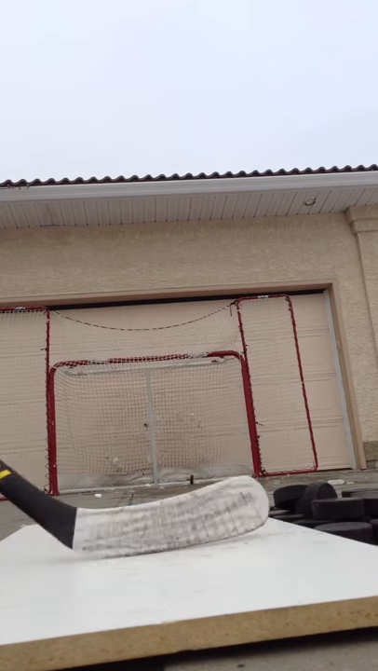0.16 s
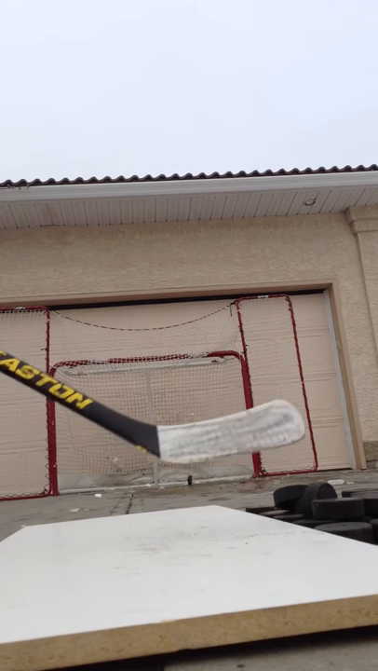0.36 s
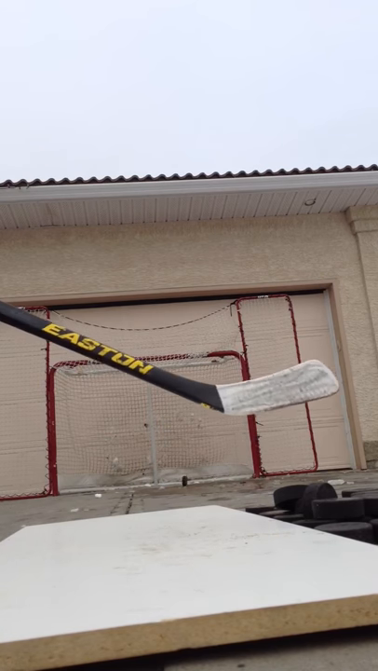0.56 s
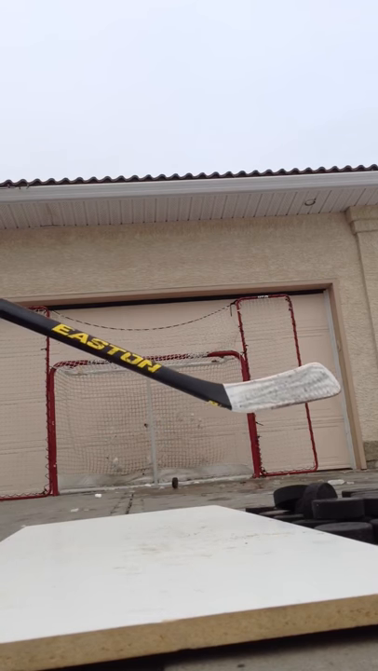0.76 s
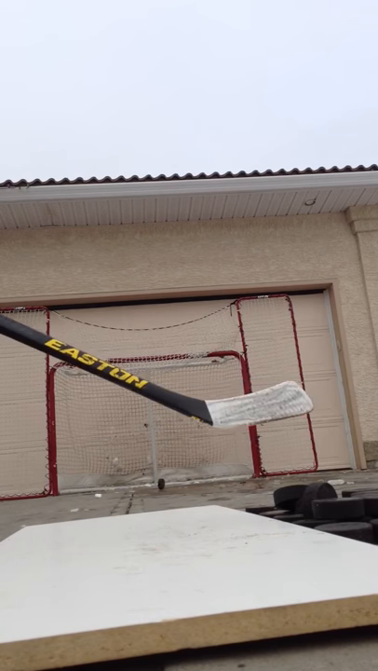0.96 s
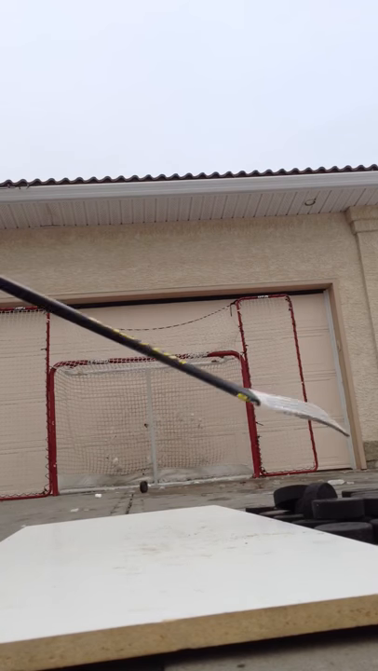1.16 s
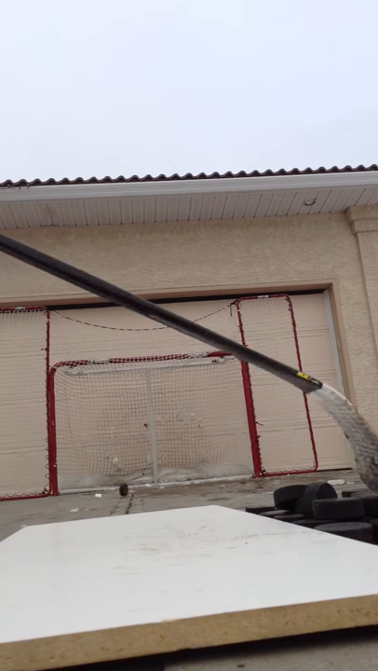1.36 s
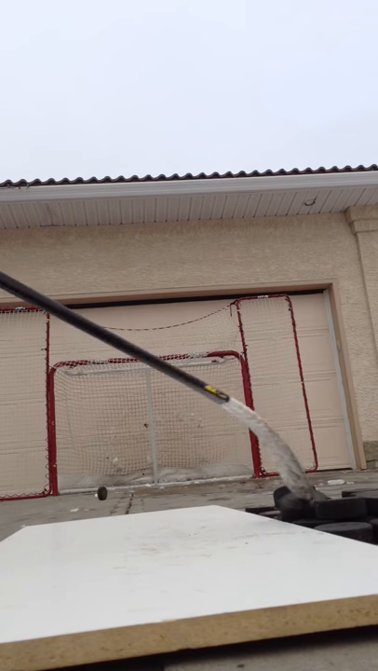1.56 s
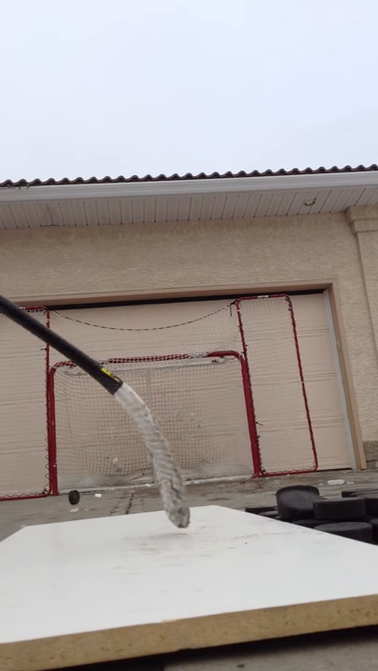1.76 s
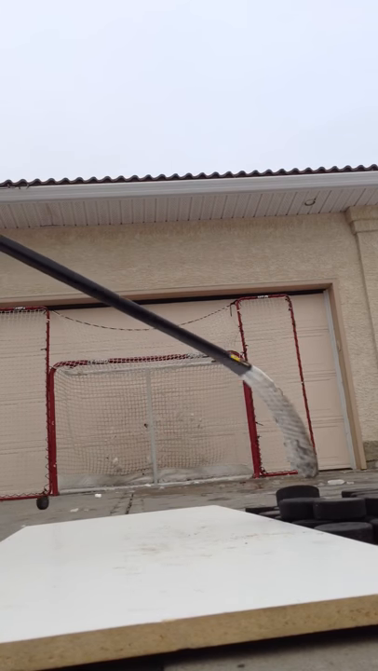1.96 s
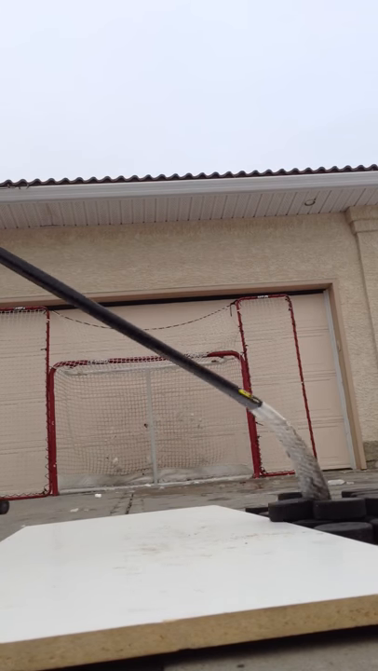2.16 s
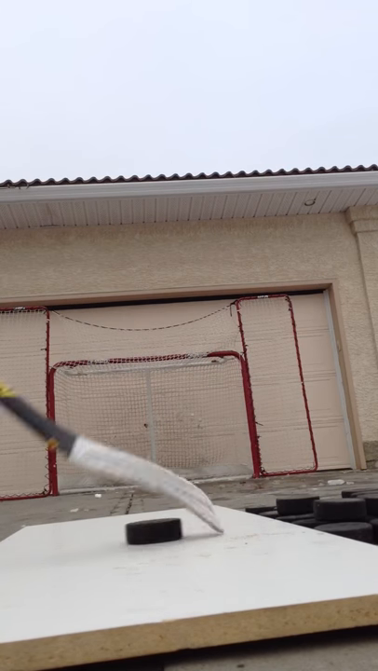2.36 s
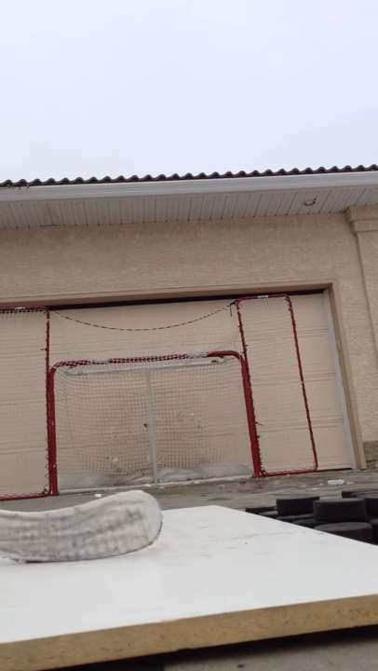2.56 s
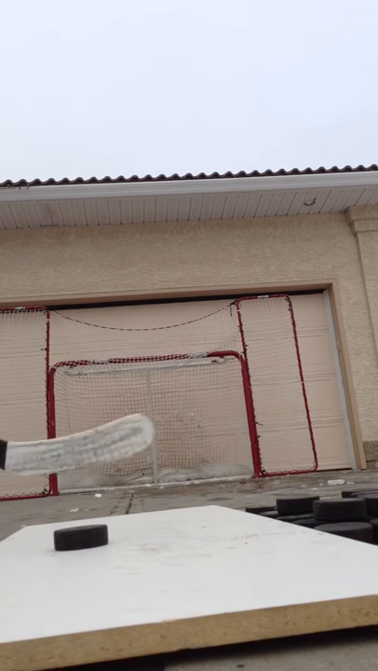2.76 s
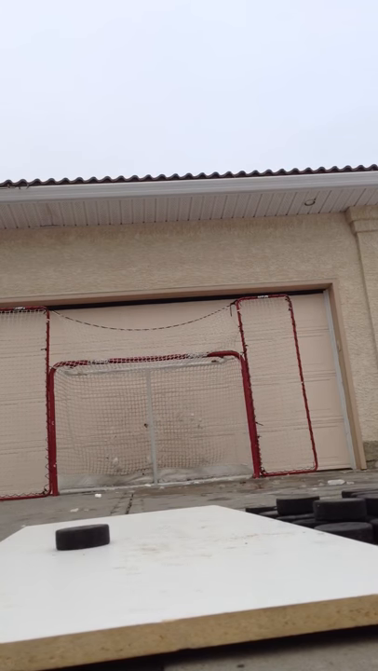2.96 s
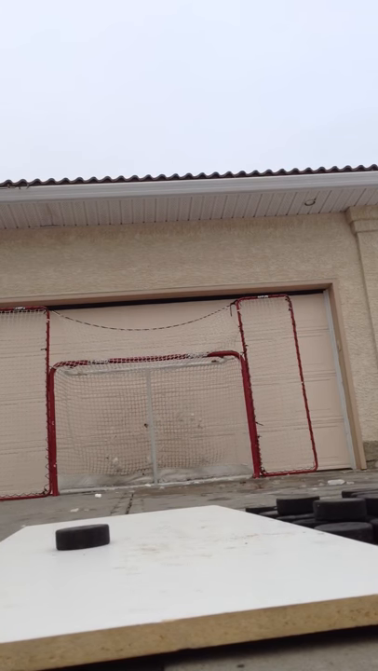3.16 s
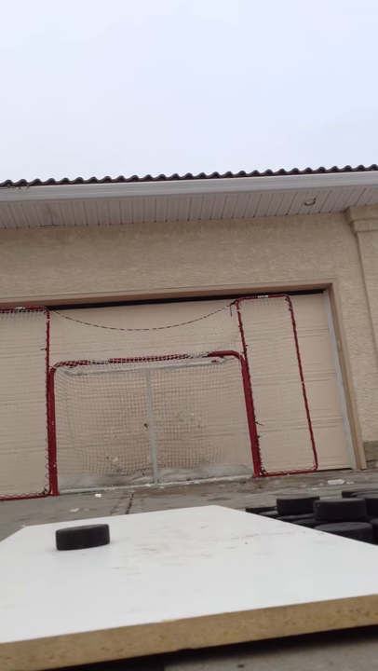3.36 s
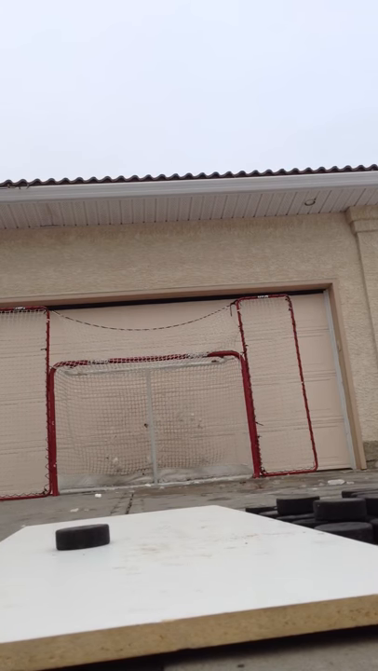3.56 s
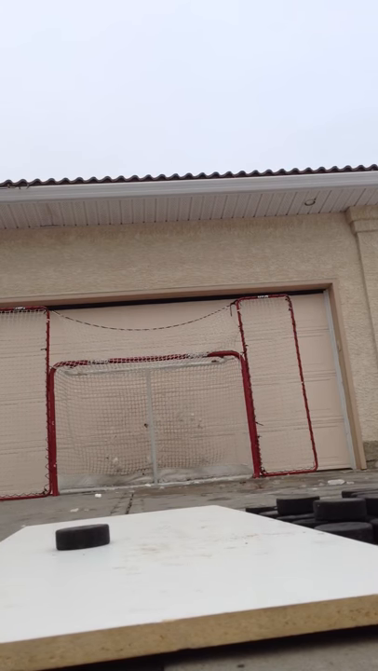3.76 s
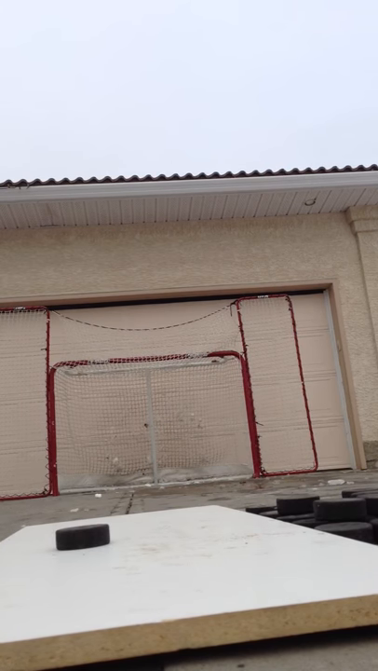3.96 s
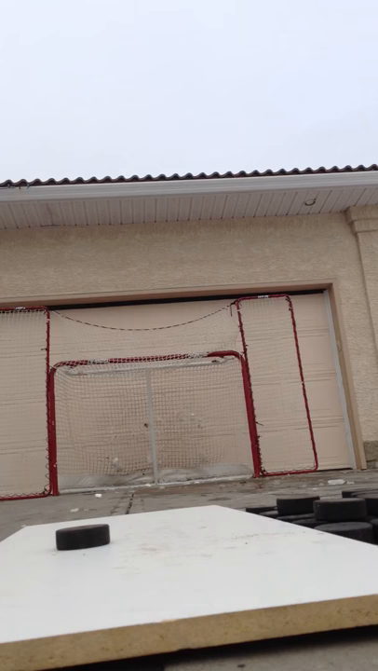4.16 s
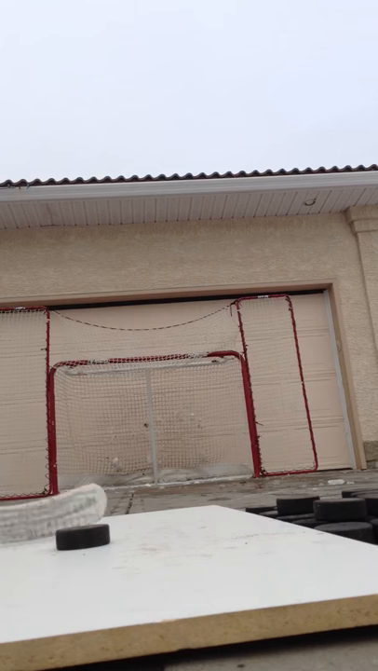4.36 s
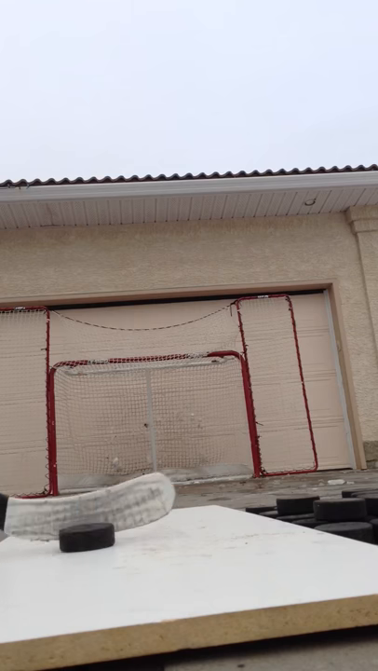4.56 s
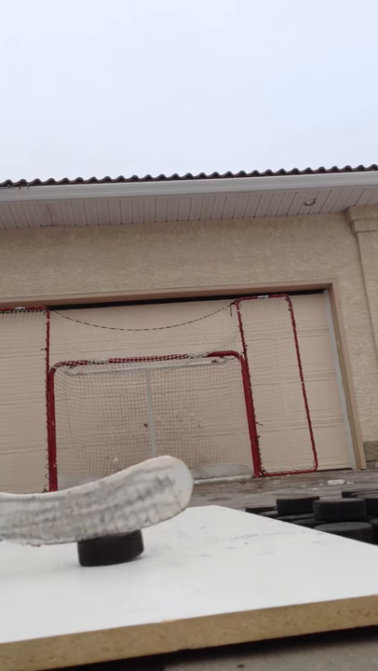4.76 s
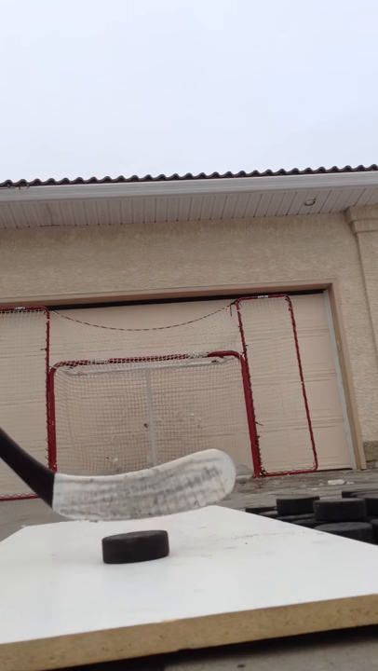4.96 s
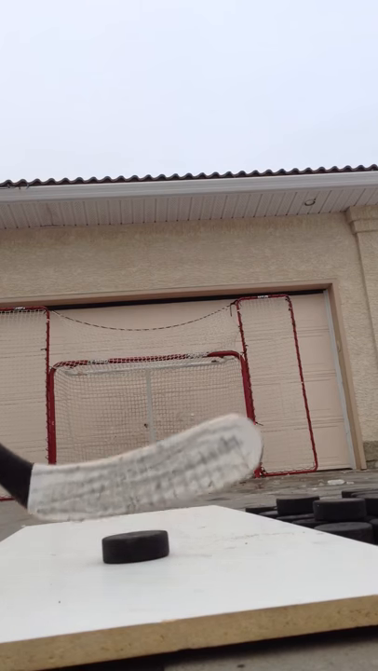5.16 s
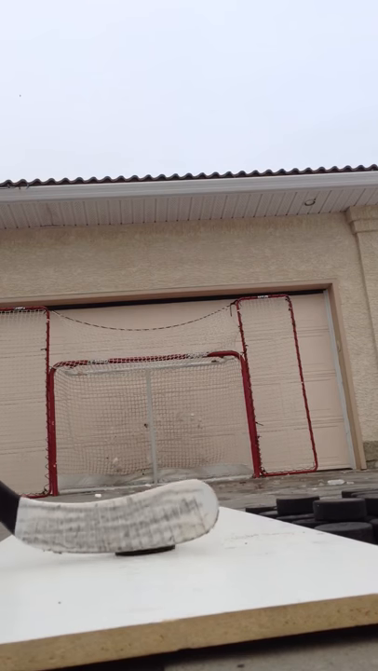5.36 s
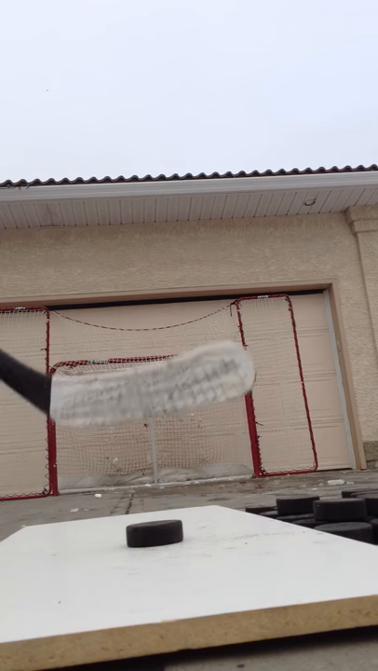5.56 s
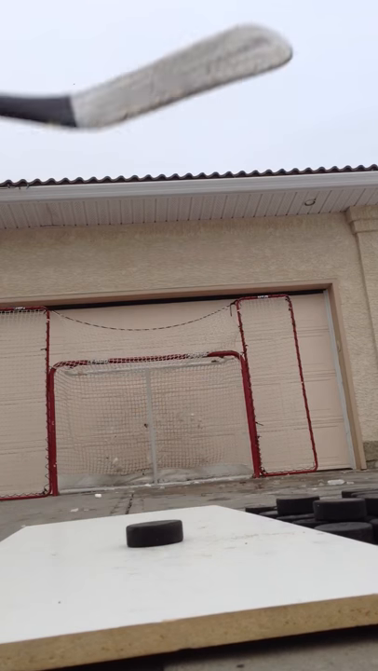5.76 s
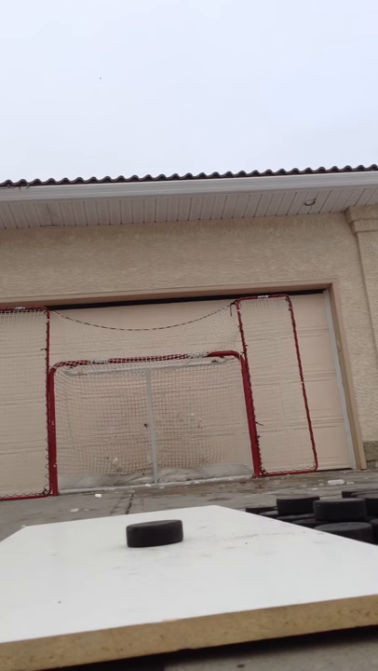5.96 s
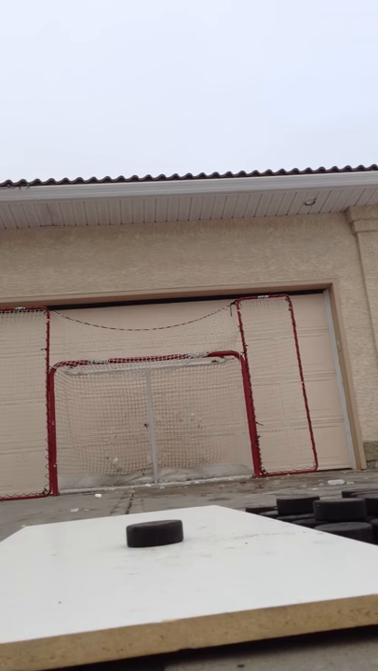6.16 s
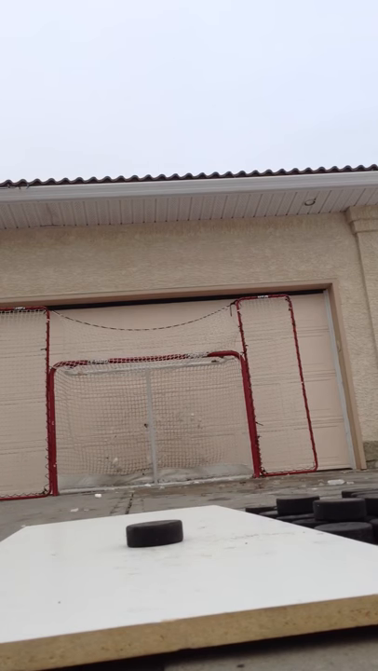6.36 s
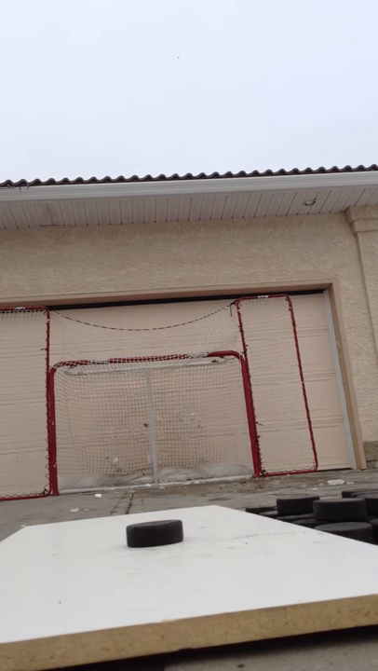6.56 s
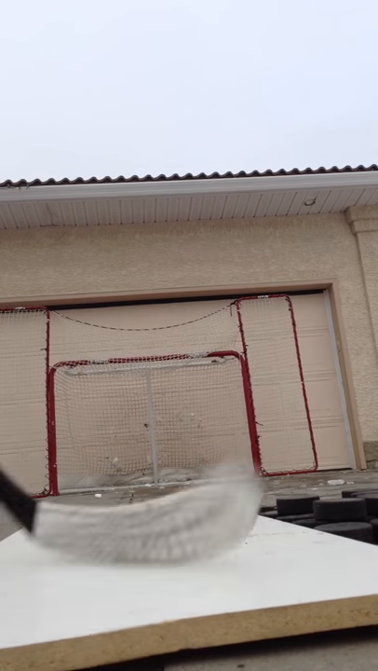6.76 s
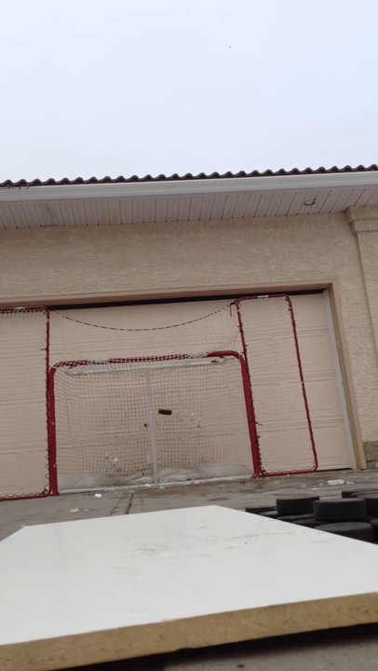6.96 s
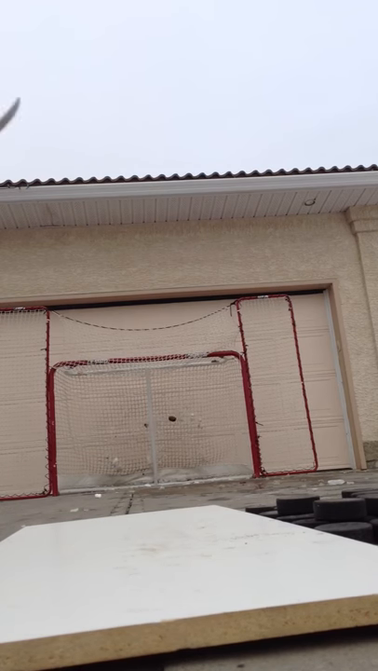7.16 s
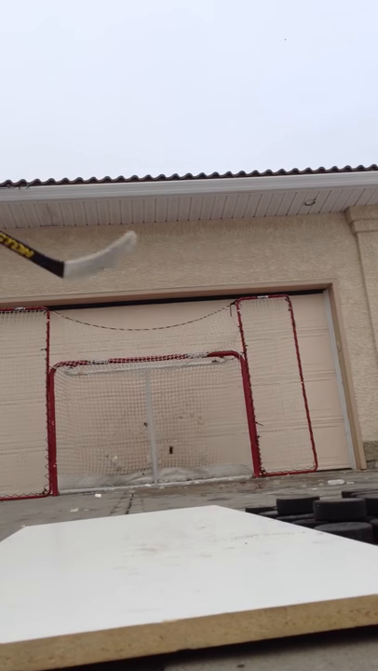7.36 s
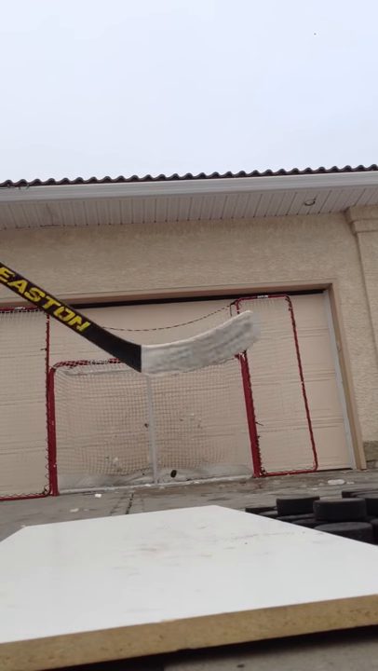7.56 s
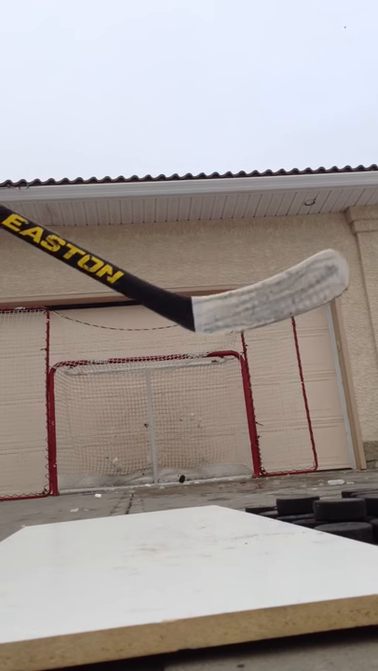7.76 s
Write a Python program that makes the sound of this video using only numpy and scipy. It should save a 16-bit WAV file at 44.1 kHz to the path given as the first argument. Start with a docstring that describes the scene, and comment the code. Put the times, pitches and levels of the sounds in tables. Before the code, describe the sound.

In a driveway, a hockey blade hits a board with a bright, hollow smack and short rattling bounces. Light clacks, a knock and a scraping pull bring a puck onto it. Feet shift on gritty concrete, then firm taps ring the board in two small groups. After a pause, a harsh burst of near-merged cracks fires the puck; the board clatters and shoes crunch. Faint echo from a garage front, dry and close.

```python
"""A hockey stick taps a shooting board in a driveway, rakes a puck from the pile, dribbles it and shoots.
Low rumble and hiss run throughout; shoes scuff and grit cracks as random slips and short noise bursts.
Each blow sends bending waves through the board, which rings in its modes and drops back on the concrete.
Blade and puck slide between blows; late on, the blade drives along the board in the shot.
The garage front echoes the impacts, and the microphone overloads on the loudest of them."""
import sys
import numpy as np
from scipy import signal
from scipy.fft import rfft, irfft, next_fast_len
from scipy.io import wavfile
from scipy.ndimage import uniform_filter1d

SR = 44100
rng = np.random.default_rng(int(sys.argv[2]) if len(sys.argv) > 2 else 0)


def transcribe(u):
    """Save the signal u as a 16-bit wav file named by the first command-line argument.

    u: samples, shape (n,) or (channels, n), limited to [-1, 1]; the rate is SR.
    q: integer samples, one column per channel.
    """
    v = np.clip(np.atleast_2d(u).T, -1, 1)
    q = np.round(v * 32767).astype(np.int16)
    wavfile.write(sys.argv[1], SR, q)


N = 344596

# steady distant rumble and hiss: (frequency [Hz], gain [dB])
AIR_COLOUR = [(25, -37.5), (55, -24), (90, -11), (150, 0), (260, 1.5), (420, -10.5), (800, -16),
              (1700, -23), (3500, -31), (8000, -31.5), (15000, -41)]
# gusts on the microphone: (start [s], length [s], level [dB])
GUSTS = [(6.16, 0.04, -43), (6.45, 0.3, -45), (6.76, 0.029, -36), (6.89, 0.1, -34)]
# gust spectrum: (frequency [Hz], gain [dB])
GUST_COLOUR = [(25, -23), (55, -13), (100, -0.5), (160, 2.5), (250, 1), (400, -25), (2000, -28)]
# the player's shoes and clothes shift: (start [s], length [s], rasp before trim [dB], hiss before trim [dB])
SHUFFLES = [(0, .16, -49.5, -46), (.19, .05, -61, -40.5), (1.05, 0.075, -61, -65), (1.24, 0.062, -64, -47),
            (1.34, 0.066, -54, -58), (1.53, 0.053, -60, -49), (1.96, 0.28, -56, -61),
            (2.95, 0.092, -51.5, -49), (3.07, 0.085, -48.5, -39), (3.22, 0.17, -59, -43),
            (3.32, 0.18, -52, -50), (3.66, 0.077, -58, -57), (3.75, .13, -52, -42.5),
            (3.9, 0.23, -55.5, -55), (4.32, .08, -65, -68.5), (4.41, .13, -63.5, -53.5),
            (6.25, 0.2, -49.5, -44), (6.48, 0.2, -48, -51.5), (6.63, 0.086, -52, -45.5),
            (6.79, 0.11, -42.5, -39), (7.17, 0.07, -41, -51), (7.39, 0.38, -41, -41.5),
            (7.69, 0.078, -44.5, -41.5)]
# blade and puck slide on the board: (start [s], length [s], rasp before trim [dB], hiss before trim [dB])
SLIDES = [(.27, 0.11, -34, -49), (.43, 0.15, -45.5, -59.5), (1.63, .1, -45, -43), (1.73, 0.056, -41, -42),
          (2.24, 0.55, -32.5, -42.5), (2.49, 0.17, -31.5, -44), (2.73, 0.15, -40.5, -58.5),
          (4.63, 0.18, -37.5, -45), (4.87, 0.09, -38.5, -60), (5.44, .12, -36, -50.5),
          (5.58, 0.032, -39.5, -44), (5.86, 0.026, -52.5, -53.5), (6.98, 0.14, -29.5, -41)]
# spectrum of the rubbing rasp: (frequency [Hz], gain [dB])
RASP_COLOUR = [(30, -58.5), (120, -10), (300, 8.5), (500, 10), (1100, 4.5), (2400, 5.5), (4000, -1.5),
               (7000, -20.5), (15000, -22)]
# spectrum of the rubbing hiss: (frequency [Hz], gain [dB])
HISS_COLOUR = [(40, -48.5), (300, -22.5), (1500, -5), (3500, 1), (5500, 0), (8000, 2.5), (11000, -2),
               (15000, -10)]
# short scuffs on concrete, and near 7.35 s the puck hitting the net or door: (time [s], length [s], level [dB])
SCUFFS_AND_HITS = [(3.03, 0.13, -35.5), (3.181, 0.017, -38.5), (3.717, 0.1, -41.5), (4.028, 0.077, -33.5),
                   (6.096, 0.056, -41.5), (7.293, 0.071, -31), (7.346, 0.09, -25), (7.365, 0.027, -21.5)]
# scuff spectrum: (frequency [Hz], gain [dB])
SCUFF_COLOUR = [(40, -38.5), (200, 2.5), (500, 1), (1500, -1.5), (3500, 1), (7000, 0.5), (11000, 0.5),
                (15000, -4.5)]
# grains of grit crack: (time [s], level [dB], centre [Hz])
GRIT = [(.1093, -37, 3500), (.3884, -31.5, 4440), (.4929, -33, 7020), (.5567, -40.5, 6500),
        (2.2666, -29, 8000), (3.069, -27, 1680), (3.116, -30.5, 1770), (3.3364, -30.5, 2800),
        (3.357, -38, 4000), (3.367, -28, 2800), (3.3905, -31.5, 2530), (3.414, -35.5, 2500),
        (4.0288, -31, 3960), (4.0442, -28.5, 5860), (4.0593, -33.5, 7000), (4.081, -31, 5000),
        (4.6307, -34.5, 5000), (4.826, -34, 8000), (6.9691, -18, 6900), (6.9787, -23, 5000),
        (6.9967, -28.5, 7000), (7.383, -12, 5100)]
# dry clacks and thumps of stick and pucks: (time [s], level [dB], centre [Hz], t60 [s])
CLACKS = [(.24, -21.5, 260, 0.15), (0.28, -22, 3000, 0.063), (0.5947, -39, 3700, 0.065),
          (0.661, -46.5, 4000, 0.082), (1.066, -46, 3000, .03), (1.3633, -25, 1700, 0.037),
          (1.5877, -33, 3000, 0.024), (1.6592, -32.5, 1400, 0.022), (2.1302, -32.5, 1000, 0.045),
          (2.168, -20.5, 1050, 0.018), (2.2227, -31, 8000, 0.018), (3.32, -28.5, 2600, .035),
          (3.4452, -19, 1700, 0.034), (3.48, -33.5, 5000, 0.022), (3.7231, -30.5, 1100, 0.028),
          (4.4248, -38.5, 2500, 0.024), (5.77, -48, 2000, 0.084), (6.1546, -30, 2200, 0.04),
          (7.299, -25.5, 5000, 0.062), (7.5556, -36.5, 1500, .04), (7.735, -38.5, 900, 0.1),
          (7.763, -34.5, 800, 0.052)]
# the bent blade drives along the board in the shot: (start [s], length [s], level [dB])
DRIVES = [(6.838, .04, -26.5), (6.876, 0.025, -12.5), (6.927, 0.0054, -13.5), (6.955, 0.083, -30)]
# spectrum of the driving blade: (frequency [Hz], gain [dB])
DRIVE_COLOUR = [(40, -43), (300, 2), (900, -7), (1400, -5.5), (2400, 0), (4000, -4.5), (6500, -7.5),
                (10000, -13.5), (15000, -24)]
# the board drops back on the concrete after a blow: (time [s], level [dB])
BOUNCES = [(.3058, -20.5), (.3201, -21.5), (.3515, -20.5), (.37, -15), (.4005, -21.5), (.4306, -18.5),
           (.4834, -29.5), (.5328, -29), (1.628, -39.5), (1.728, -25), (1.752, -28.5), (1.775, -28.5),
           (4.6607, -29), (4.9331, -29), (4.988, -32), (5.033, -29.5), (5.0494, -41), (5.0863, -36),
           (5.4121, -30.5), (5.4617, -31), (5.4989, -31), (6.9591, -18.5), (7.0624, -13.5), (7.085, -15),
           (7.1259, -11.5), (7.1593, -19), (7.1994, -23), (7.2235, -19.5), (7.2468, -36), (7.271, -26),
           (7.2862, -27.5), (7.319, -27.5)]
# blade, puck or shoe strikes the board:
# (time [s], level [dB], hardness [Hz], bass shelf [dB], relative ring [dB], damping [1 = none extra])
BLOWS = [(0.2401, -3, 3230, -15.5, 2, 0.78), (1.3631, -29.5, 975, 3, 5, 1.7),
         (1.603, -34, 523, -27, 12, 2.2), (1.7104, -11.5, 2520, -10, -2, 0.82),
         (2.23, -23, 1110, 10, 15, 1.4), (2.2713, -15.5, 1460, -12, 2, 1.02),
         (2.3128, -13.5, 1970, -14, 0, 1.2), (2.3454, -20, 1300, -17, 21, 1.3),
         (2.51, -20.5, 1210, 3, 15, 1.4), (2.6351, -16.5, 1990, -3.5, -11, 1.02),
         (2.7715, -29, 1120, -20, 14.5, 0.84), (3.446, -25, 860, 11, -6.5, 2.4),
         (3.483, -41, 810, -7, 9.5, 1.5), (4.4898, -8, 1303, -11, 15.5, 1.01),
         (4.6285, -15, 1250, 0, -12.5, 2.2), (4.755, -13, 1230, -17, 5, 1), (4.8264, -7, 1210, -1, 2, 1.19),
         (4.8885, -11, 1990, -1.5, -6, 1.2), (5.3524, -13, 1320, -17.5, 6.5, 0.91),
         (5.3579, -11.5, 1450, -13.5, -.5, 0.91), (5.3918, -15.5, 1220, 5, -13, 1.9),
         (6.107, -34, 730, 17, 13.5, 4.1), (6.876, -0.5, 2070, -19, 7, .6), (6.887, -10, 1720, -16, 15, 1),
         (6.8965, -4, 1610, -19, -1, 0.82), (6.9078, -9.5, 1780, -12, 15, .6),
         (6.9315, -19, 3000, 21, 7, .65), (6.945, -10.5, 1200, 25, -18, .7),
         (6.992, -25, 1400, -25, 0, 1.3), (7.014, -20.5, 1500, 9, 12, .65)]
# the board's modes, before each blow detunes and damps them: (frequency [Hz], level [dB], t60 [s])
BOARD_MODES = [(279.5, -6, 0.34), (419.6, -7, 0.27), (473.8, -3, .19), (557.5, -9.5, 0.24),
               (604.4, -8, 0.16), (684, -4, 0.16), (725, -5.5, 0.16), (828, -4.5, 0.19), (904, -21.5, 0.19),
               (981, -4.5, 0.14), (1026, -9, 0.078), (1113, 2, 0.056), (1154, -8.5, 0.14),
               (1272.5, -0.5, 0.094), (1370, -6, 0.033), (1398, -10, 0.068), (1568, -5, .055),
               (1930, 1, 0.029), (2150, 0, 0.033), (2370, -2.5, 0.041), (2763, -9.5, .04),
               (3260, -13, .035), (3700, -15.5, .02), (4930, -16, .022)]
# decay of bending waves in the board: (frequency [Hz], t60 [s])
WAVE_T60 = [(150, 0.3), (500, 0.39), (1200, 0.31), (2500, 0.054), (5000, .03), (14000, 0.006)]
# how well the board radiates: (frequency [Hz], gain [dB])
RADIATION = [(30, -36.5), (100, -38.5), (200, -9.5), (300, -2), (450, 3), (1200, -1.5), (3000, 5.5),
             (6000, 2), (10000, 6.5), (15000, -18.5)]
# decay of the outdoor tail: (frequency [Hz], t60 [s])
YARD_T60 = [(150, 0.33), (600, 0.91), (2000, 0.9), (4000, .5), (12000, .2)]

AIR_DB = -56
WHISTLE_START_S, WHISTLE_LENGTH_S, WHISTLE_HZ, WHISTLE_DB = 4.135, .24, 5770, -64
GRIT_T60_S = .011
# bounces are soft and bassy; a stronger one is a little harder
BOUNCE_HARD_HZ, BOUNCE_HARD_HZ_PER_DB = 1520, 16  # at 0 dB, and the slope
BOUNCE_BASS_DB, BOUNCE_RING_DB, BOUNCE_DAMPING = 16, -2, 1.22
BAND_LIMIT_HZ = 15600
SIZE = 16384  # samples in one impact
HZ = np.fft.rfftfreq(SIZE, 1 / SR) + 1  # offset keeps 0 Hz out of the divisions
AGE_S = np.arange(SIZE) / SR


def amp(db):
    """Decibels to gain."""
    return 10 ** (np.asarray(db) / 20)


def unit(x):
    """Scales to an rms of one."""
    return x / np.sqrt(np.mean(x ** 2) + 1e-20)


def fade(age_s, t60_s):
    """Exponential decay, 60 dB down after t60."""
    return np.exp(-np.log(1000) * age_s / t60_s)


def read(points, hz):
    """Interpolates a table on a log-frequency axis."""
    f, value = np.transpose(points)
    return np.interp(np.log(hz + 1), np.log(f), value)


def add(mix, start_s, sound):
    """Mixes a sound in at its start time."""
    part = mix[max(round(start_s * SR), 0):][:len(sound)]
    part += sound[:len(part)]


def causal(gain):
    """Minimum-phase response with this gain, by folding the cepstrum."""
    cepstrum = irfft(np.log(np.maximum(gain, 1e-5)))
    cepstrum[1:SIZE // 2] *= 2
    cepstrum[SIZE // 2 + 1:] = 0
    return np.exp(rfft(cepstrum))


def coloured(x, colour):
    """Gives a long signal a spectrum and an rms of one."""
    size = next_fast_len(N)
    gain = amp(read(colour, np.fft.rfftfreq(size, 1 / SR)))
    return unit(irfft(rfft(x, size) * gain, size)[:N])


def unsteady(depth_db, per_s):
    """A gain that wanders at random about one."""
    points = rng.standard_normal(N // 100)
    wander = np.interp(np.arange(N) / SR * per_s, np.arange(len(points)), points)
    return amp(depth_db * wander)


def stroke(start_s, length_s, rise_s, sag_db_per_s, release_s):
    """Envelope of one push: it builds up, changes slowly while it lasts, and dies away."""
    age = np.arange(N) / SR - start_s
    attack = np.clip(.5 + age / rise_s, 0, 1)  # half built up at the start time
    sag = amp(-sag_db_per_s * np.clip(age, 0, length_s))
    release = np.exp(-np.maximum(age - length_s, 0) / release_s)
    return attack * sag * release


def strokes(table, rise_s, sag_db_per_s, release_s):
    """Power-sums the pushes of a table: one gain curve per level column."""
    power = 0
    for start_s, length_s, *db in table:
        envelope = stroke(start_s, length_s, rise_s, sag_db_per_s, release_s)
        power = power + (amp(db)[:, None] * envelope) ** 2
    return np.sqrt(power)


def friction(colour, per_s, spread_db, smooth):
    """Tiny slips of very unequal size over a smooth hiss."""
    happens = rng.random(N) < per_s / SR
    size = amp(spread_db * np.minimum(rng.exponential(1, N), 4))
    slips = happens * size * rng.choice([-1, 1], N)
    return coloured(unit(slips) + smooth * rng.standard_normal(N), colour)


def patchy(x, depth_db, frames=24, bins=13):
    """The colour of a rubbing sound drifts as the contact moves."""
    z = signal.stft(x, nperseg=512)[2]
    patches = uniform_filter1d(rng.standard_normal(z.shape), size=frames, axis=1)
    patches = unit(uniform_filter1d(patches, size=bins, axis=0))
    return unit(signal.istft(z * amp(depth_db * patches), nperseg=512)[1][:N])


def rubbing(catch_db, slips_per_s, rasp_smooth, hiss_smooth):
    """The two voices of rubbing: a lower, catching rasp and a fine hiss."""
    rasp = friction(RASP_COLOUR, per_s=slips_per_s, spread_db=3, smooth=rasp_smooth)
    hiss = friction(HISS_COLOUR, per_s=2500, spread_db=8.0, smooth=hiss_smooth)
    rasp = patchy(unsteady(catch_db, 70) * rasp, depth_db=3.5)
    hiss = patchy(unsteady(3.8, 40) * hiss, depth_db=2.5)
    return rasp, hiss


def outdoors():
    """Steady rumble and hiss, a few gusts on the microphone and one thin, wavering whistle."""
    air = amp(AIR_DB) * unsteady(3.6, 19) * coloured(rng.standard_normal(N), AIR_COLOUR)
    gusts = strokes(GUSTS, rise_s=0.024, sag_db_per_s=-1, release_s=0.054)[0]
    air += gusts * unsteady(5.5, 25) * coloured(rng.standard_normal(N), GUST_COLOUR)
    swell = signal.windows.tukey(int(WHISTLE_LENGTH_S * SR), .6)
    waver = 1 + .006 * unit(uniform_filter1d(rng.standard_normal(len(swell)), size=1200))
    tone = np.sin(2 * np.pi * np.cumsum(WHISTLE_HZ * waver) / SR)
    add(air, WHISTLE_START_S, amp(WHISTLE_DB) * swell * tone)
    return air


def yard(x, echo_s=0.045, echo_db=-24, echo_t60_s=0.04, tail_db=-30):
    """The garage front answers once; houses farther off leave a faint tail."""
    hz, t, z = signal.stft(rng.standard_normal(SR), SR, nperseg=256)
    tail = signal.istft(z * fade(t, read(YARD_T60, hz)[:, None]), SR, nperseg=256)[1]
    tail *= amp(tail_db) / np.linalg.norm(tail)
    echo = rng.standard_normal(SIZE) * fade(AGE_S, echo_t60_s)
    add(tail, echo_s, amp(echo_db) * echo / np.linalg.norm(echo))
    return x + signal.fftconvolve(x, tail)[:N]


def shuffling(rasp, hiss, rasp_trim_db=0, hiss_trim_db=1):
    """The player's weight shifts on the concrete: rasp and hiss follow each push."""
    rasp_gain, hiss_gain = strokes(SHUFFLES, rise_s=0.085, sag_db_per_s=20, release_s=0.041)
    return amp(rasp_trim_db) * rasp_gain * rasp + amp(hiss_trim_db) * hiss_gain * hiss


def scuffs_and_hits():
    """Grit crunches under a short push; late on, the puck hitting the net or door is a burst of the same noise."""
    push = np.zeros(N)
    for start_s, length_s, db in SCUFFS_AND_HITS:
        add(push, start_s, amp(db) * signal.windows.tukey(max(int(length_s * SR), 2), .6))
    return push * friction(SCUFF_COLOUR, per_s=1700, spread_db=0.5, smooth=0.31)


def clacks(width=0.91, snap=1.6, skirt=1.0):
    """Stick, pucks and grit: a snap and dense, damped ringing about one centre frequency."""
    out = np.zeros(N)
    for start_s, db, hz, t60_s in CLACKS + [(*grain, GRIT_T60_S) for grain in GRIT]:
        ring = rng.standard_normal(SIZE) * fade(AGE_S, t60_s)
        ring[0] += snap
        band = (1 + ((HZ / hz - hz / HZ) / width) ** 2) ** (-skirt / 2)
        treble_loss = 1 / (1 + (HZ / (7 * hz)) ** 2)
        clack = irfft(rfft(ring) * causal(band * treble_loss))
        # level: rms of the first 4 ms
        add(out, start_s, amp(db) * clack / np.sqrt(np.mean(clack[:SR // 250] ** 2)))
    return out


def through_board(x, ring_db=-3):
    """Friction on the board keeps its modes faintly ringing."""
    ring = np.zeros(SIZE)
    for hz, db, t60_s in BOARD_MODES:
        ring += amp(db - 60 * AGE_S / t60_s) * np.cos(2 * np.pi * hz * AGE_S) / np.sqrt(t60_s)
    return unit(x + amp(ring_db) * unit(signal.fftconvolve(x, ring)[:N]))


def sliding(rasp, hiss, rasp_trim_db=-1, hiss_trim_db=1):
    """Blade and puck rub on the board; the rasp keeps it faintly ringing."""
    rasp_gain, hiss_gain = strokes(SLIDES, rise_s=0.073, sag_db_per_s=24.5, release_s=0.044)
    ringing_rasp = through_board(rasp, ring_db=-3.5)
    return amp(rasp_trim_db) * rasp_gain * ringing_rasp + amp(hiss_trim_db) * hiss_gain * hiss


def drive():
    """The bent blade judders along the board behind the puck."""
    pressure = strokes(DRIVES, rise_s=0.011, sag_db_per_s=17, release_s=0.014)[0]
    return pressure * unsteady(1.7, 300) * friction(DRIVE_COLOUR, per_s=2600, spread_db=5.5, smooth=0.83)


def bounces():
    """Each bounce of the board as a row of BLOWS: a soft, bassy blow."""
    rows = []
    for start_s, db in BOUNCES:
        hard_hz = max(BOUNCE_HARD_HZ + BOUNCE_HARD_HZ_PER_DB * db, 300)
        rows.append((start_s, db, hard_hz, BOUNCE_BASS_DB, BOUNCE_RING_DB, BOUNCE_DAMPING))
    return rows


def knocks(modes_db=-32, waves_db=-7, place_db=3.5, load=.014, nearest_s=0.000911, farthest_s=0.031,
           slope=6.3, crack_db=-25, crack_hz=4500, bass_hz=550, direct_s=.0005,
           rock_db=4.5, rock_per_s=90, grip_s=0.018, count=26):
    """A blow sends bending waves to the board's edges and back; they settle into its modes."""
    out, radiation = np.zeros(N), amp(read(RADIATION, HZ))
    mode_hz, mode_db, mode_t60_s = np.transpose(BOARD_MODES)
    decay = amp(-60 * AGE_S / mode_t60_s[:, None])
    # bending waves run faster at high pitch, so every arrival is a falling chirp
    slowness = np.sqrt(1000 / HZ)  # relative to 1 kHz
    # with this slowness, 4 pi in the phase makes the group delay equal the travel time
    direct = np.exp(-4j * np.pi * HZ * direct_s * slowness)
    path_s = np.linspace(np.sqrt(nearest_s), np.sqrt(farthest_s), count)[:, None] ** 2
    travel_s = path_s * rng.uniform(.9, 1.0, (count, 1)) * slowness
    returns = np.exp(-4j * np.pi * HZ * travel_s) * fade(travel_s, read(WAVE_T60, HZ))
    crack = amp(crack_db) / (1 + (HZ / crack_hz) ** 2)
    for start_s, db, hard_hz, bass_db, ring_db, damping in BLOWS + bounces():
        # each striking place favours other modes and paths; the blade's weight detunes and damps them
        favour, detune = rng.standard_normal((2, len(BOARD_MODES)))
        struck_hz = mode_hz * (1 + load * detune)
        swing = np.cos(2 * np.pi * struck_hz[:, None] * AGE_S) * decay
        grip = np.exp(-np.maximum(damping - 1, -.15) * AGE_S / grip_s)
        modes = amp(mode_db + place_db * favour) @ swing * grip
        # the board rocks on the concrete, so its ring dies unevenly
        rock_points = rng.standard_normal(SIZE)
        modes = modes * amp(rock_db * np.interp(AGE_S * rock_per_s, np.arange(SIZE), rock_points))
        waves = rng.choice([-1., 1.], count) @ returns
        response = direct + amp(ring_db) * (amp(modes_db) * rfft(modes) + amp(waves_db) * waves)
        # a softer contact lasts longer and loses the treble
        contact = 1 / np.sqrt(1 + (HZ / hard_hz) ** slope) + crack * (hard_hz / 2000) ** 2
        force = contact * amp(bass_db / (1 + (HZ / bass_hz) ** 2))
        blow = irfft(response * causal(force * radiation))
        # level: rms of the first 10 ms
        add(out, start_s, amp(db) * blow / np.sqrt(np.mean(blow[:SR // 100] ** 2)))
    return out


def scene():
    """Everything in the driveway, at one microphone; only the impacts, scuffs and drive echo."""
    impacts = yard(knocks() + clacks() + scuffs_and_hits() + drive())
    on_board = sliding(*rubbing(catch_db=0.5, slips_per_s=820, rasp_smooth=.7, hiss_smooth=1.8))
    on_concrete = shuffling(*rubbing(catch_db=3.0, slips_per_s=870, rasp_smooth=.7, hiss_smooth=2.3))
    return (impacts + on_board + on_concrete + outdoors())[None]


def record(dry, low_cut_hz=90):
    """The microphone overloads on the hardest blows; then its low cut and the band limit."""
    squashed = dry / (1 + (dry / .7) ** 4) ** .25
    low_cut = signal.butter(2, low_cut_hz, "highpass", fs=SR, output="sos")
    thinned = signal.sosfilt(low_cut, squashed)
    band_limit = signal.firwin(255, BAND_LIMIT_HZ, window=("kaiser", 8), fs=SR)
    return signal.oaconvolve(thinned, band_limit[None], "same")


dry = scene()
out = record(dry)
transcribe(out)
```